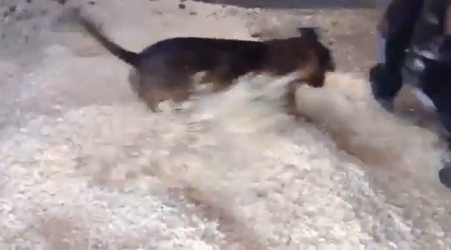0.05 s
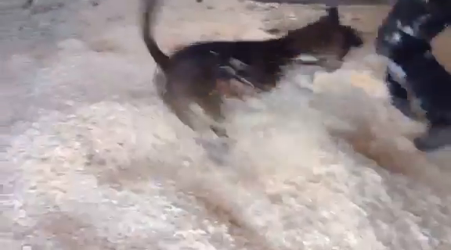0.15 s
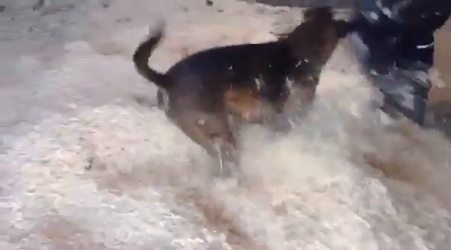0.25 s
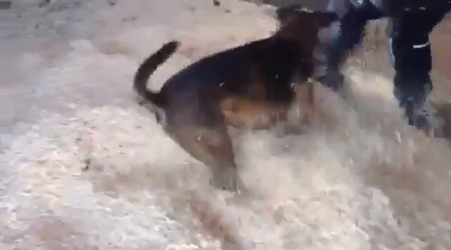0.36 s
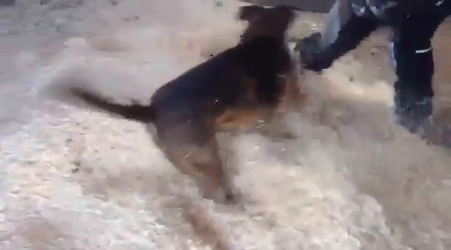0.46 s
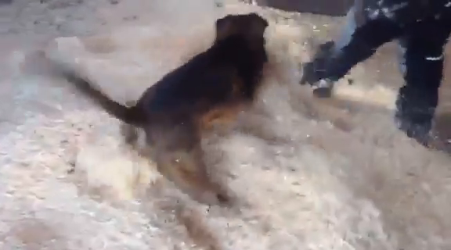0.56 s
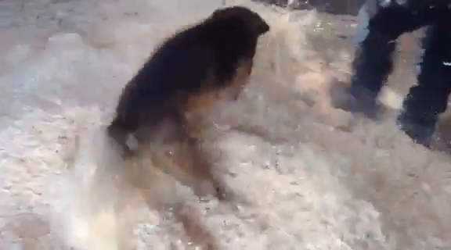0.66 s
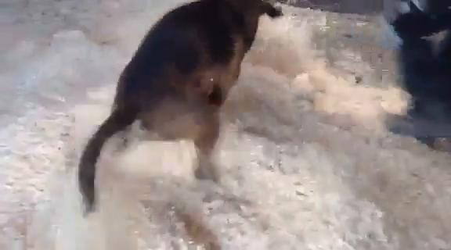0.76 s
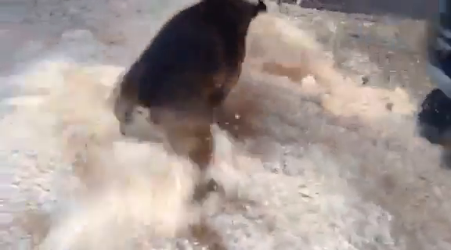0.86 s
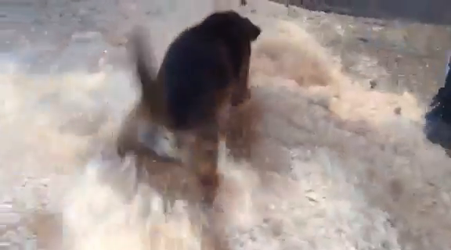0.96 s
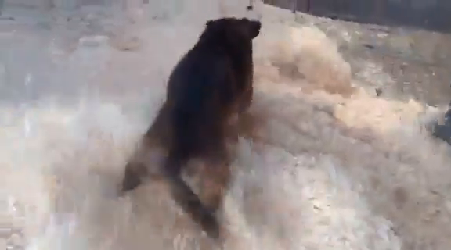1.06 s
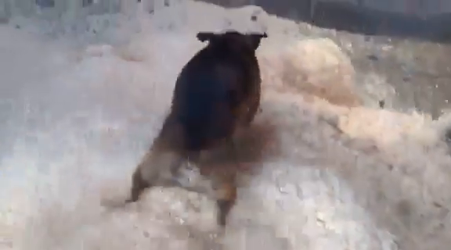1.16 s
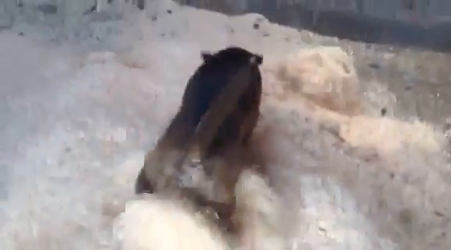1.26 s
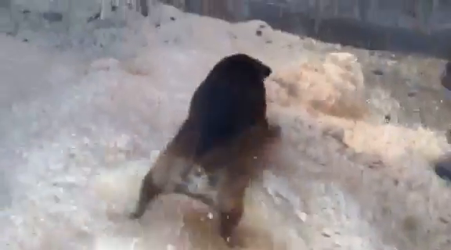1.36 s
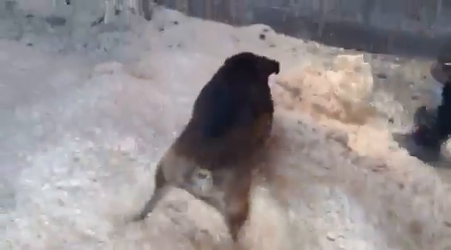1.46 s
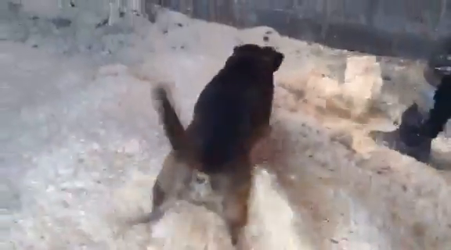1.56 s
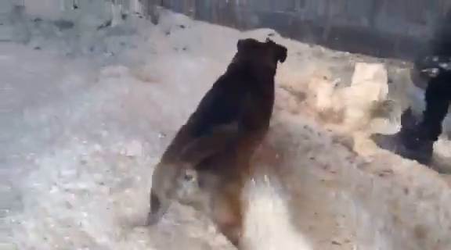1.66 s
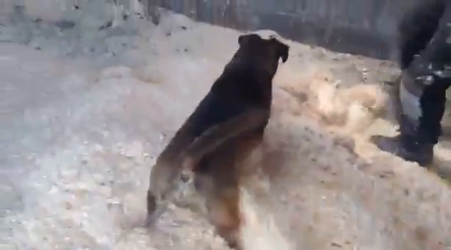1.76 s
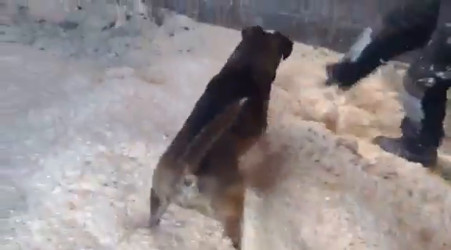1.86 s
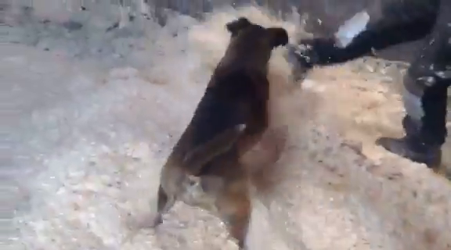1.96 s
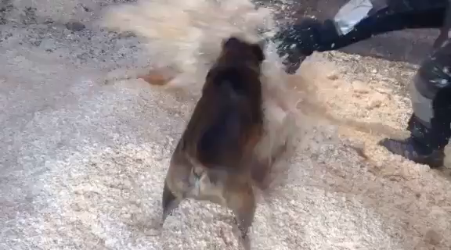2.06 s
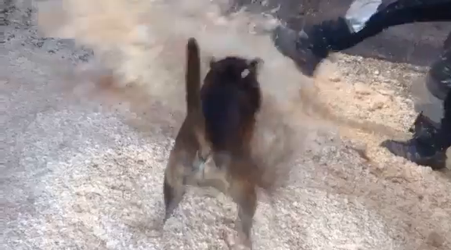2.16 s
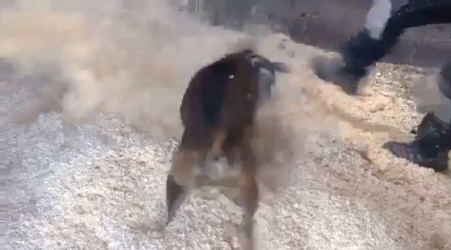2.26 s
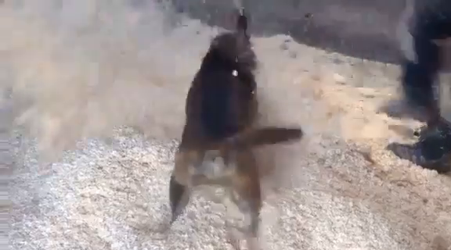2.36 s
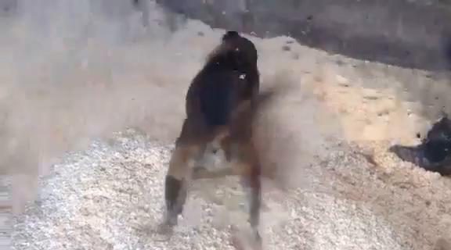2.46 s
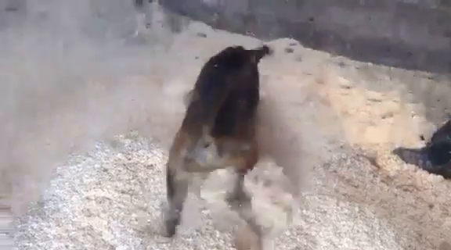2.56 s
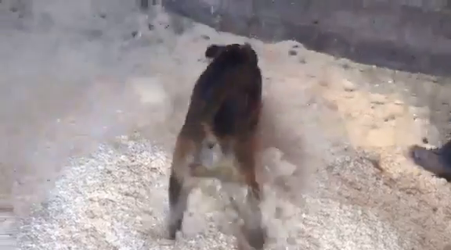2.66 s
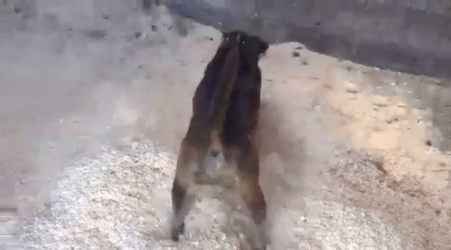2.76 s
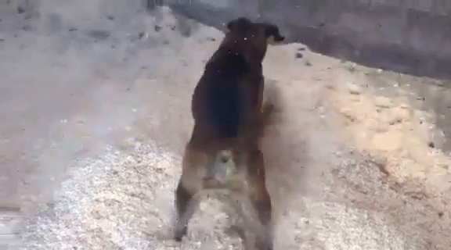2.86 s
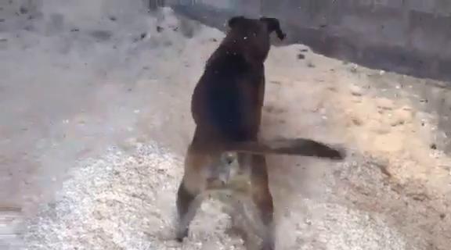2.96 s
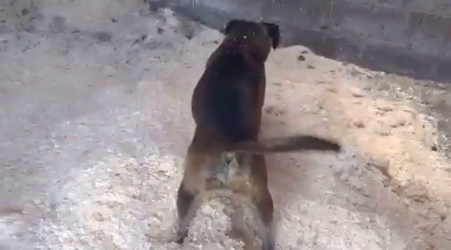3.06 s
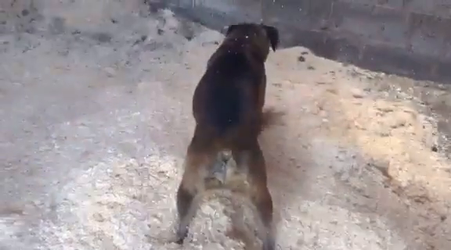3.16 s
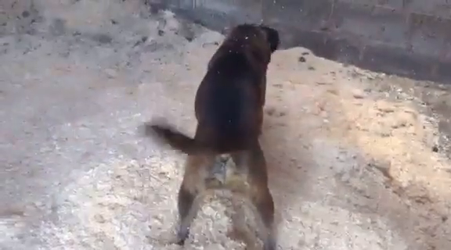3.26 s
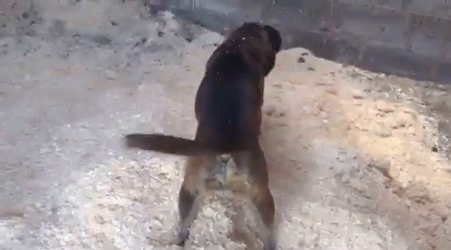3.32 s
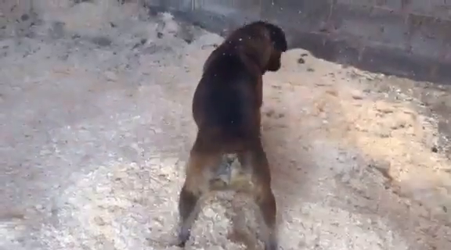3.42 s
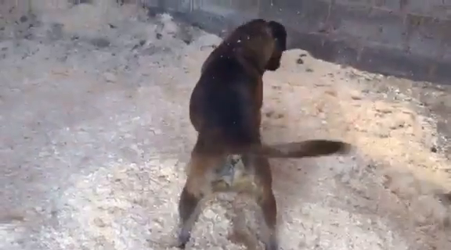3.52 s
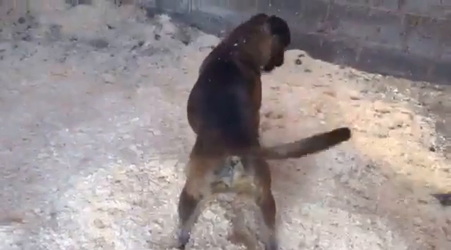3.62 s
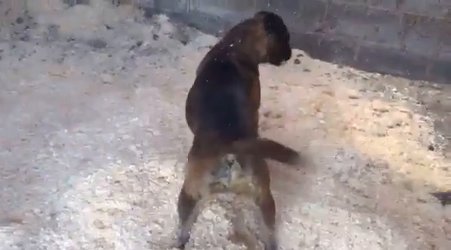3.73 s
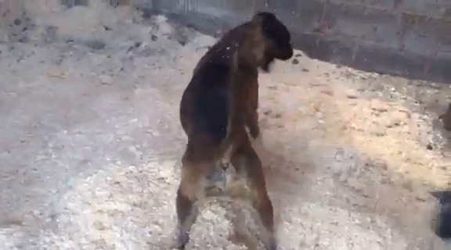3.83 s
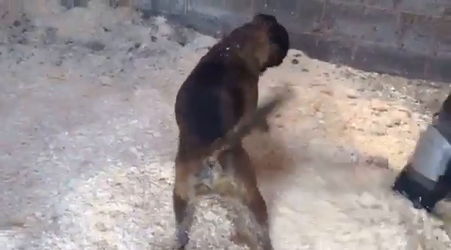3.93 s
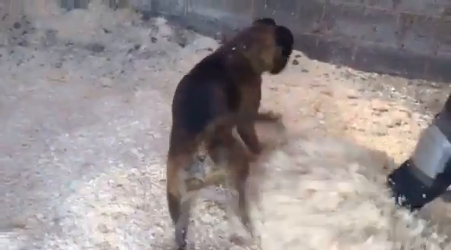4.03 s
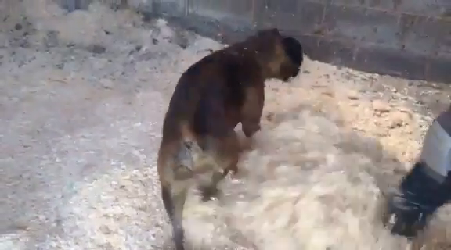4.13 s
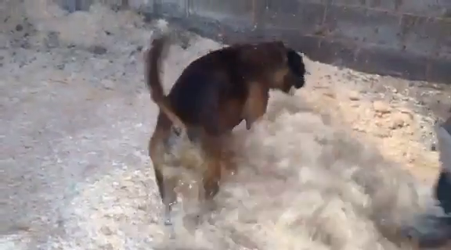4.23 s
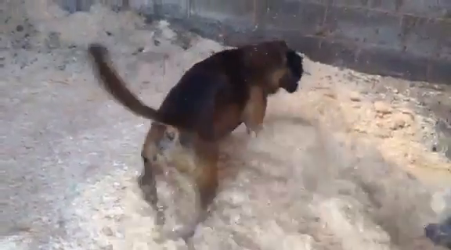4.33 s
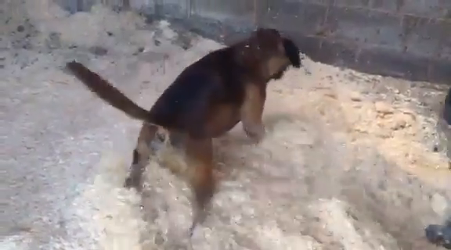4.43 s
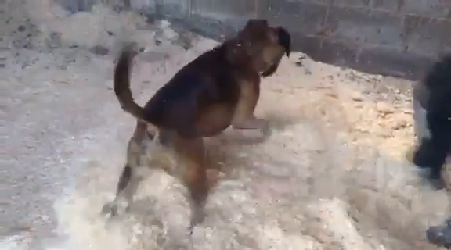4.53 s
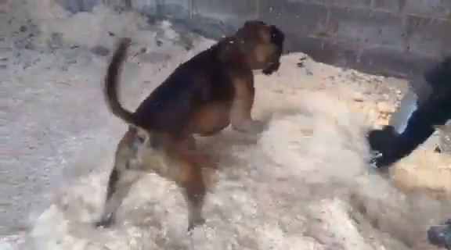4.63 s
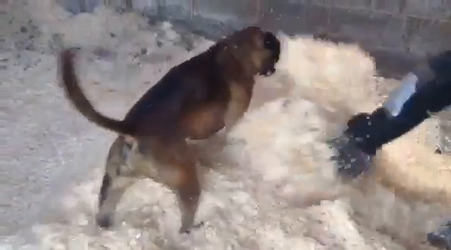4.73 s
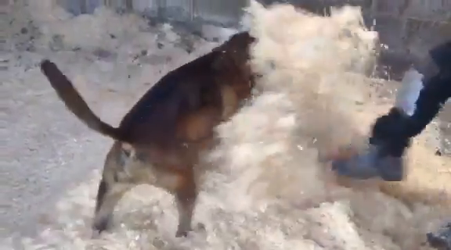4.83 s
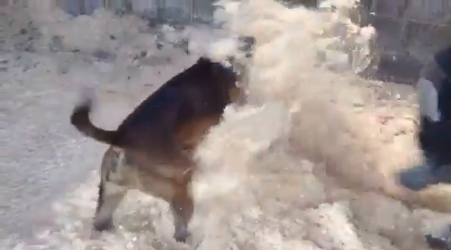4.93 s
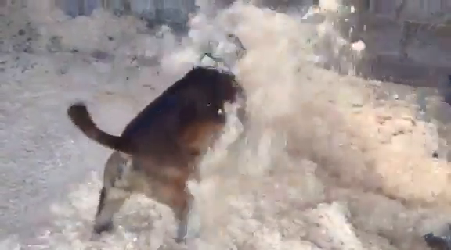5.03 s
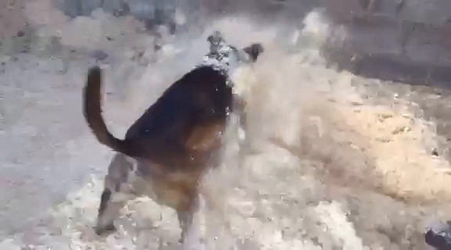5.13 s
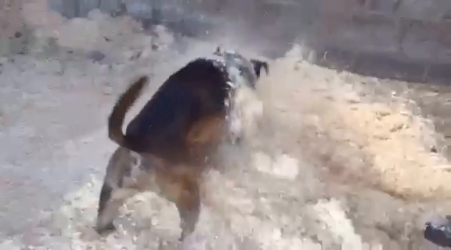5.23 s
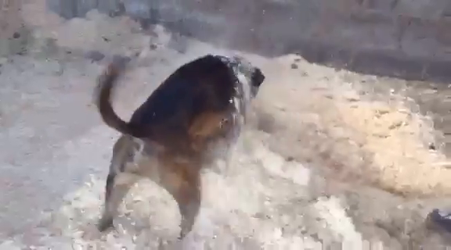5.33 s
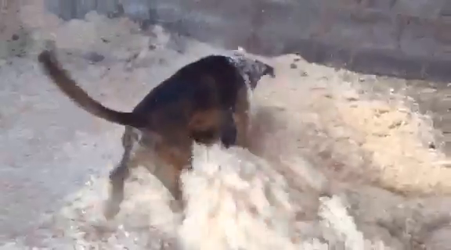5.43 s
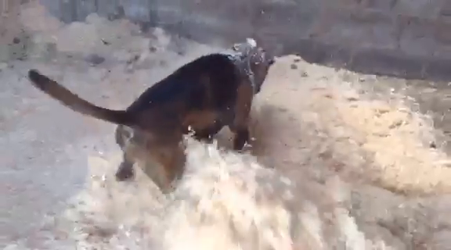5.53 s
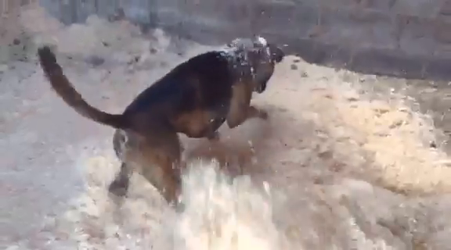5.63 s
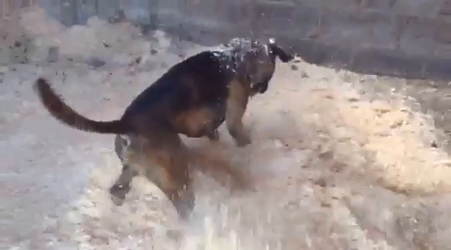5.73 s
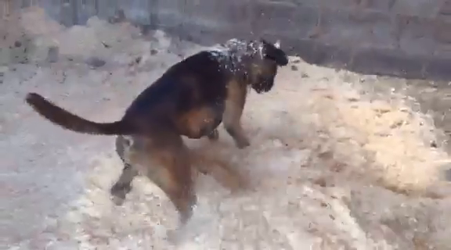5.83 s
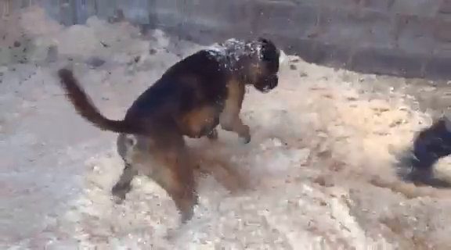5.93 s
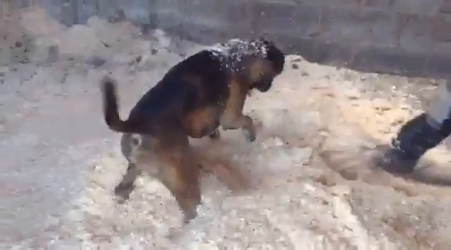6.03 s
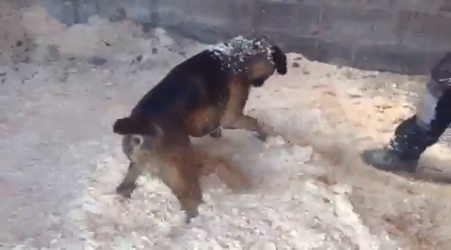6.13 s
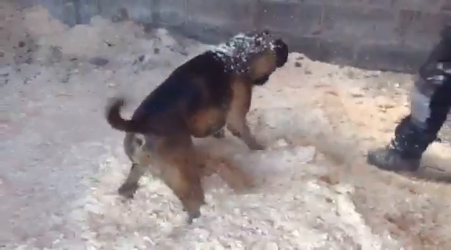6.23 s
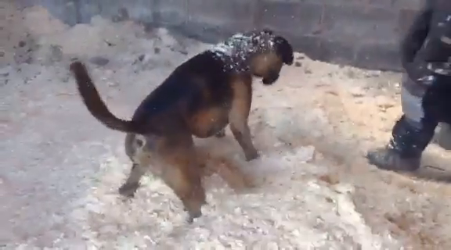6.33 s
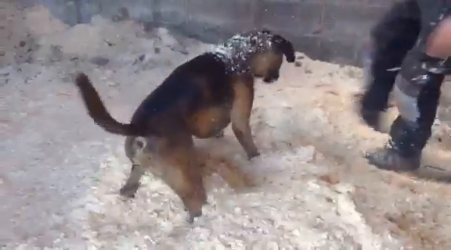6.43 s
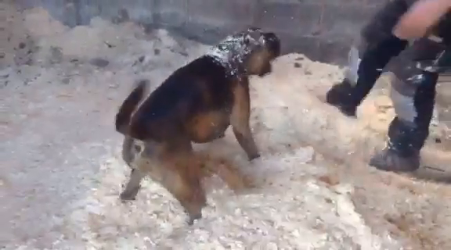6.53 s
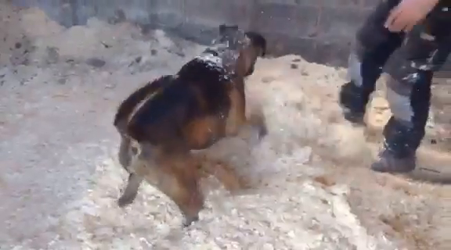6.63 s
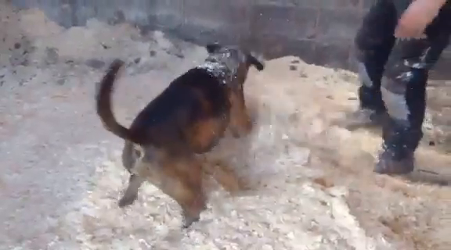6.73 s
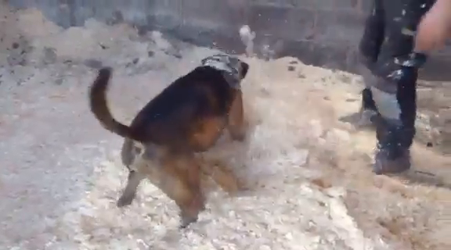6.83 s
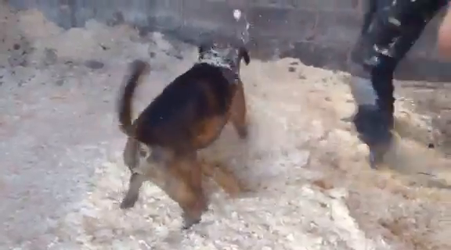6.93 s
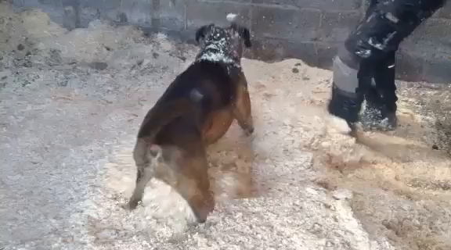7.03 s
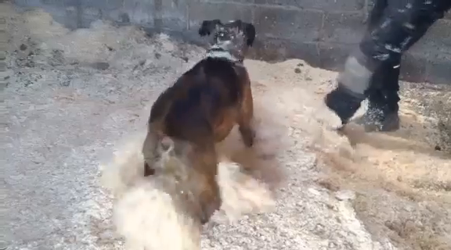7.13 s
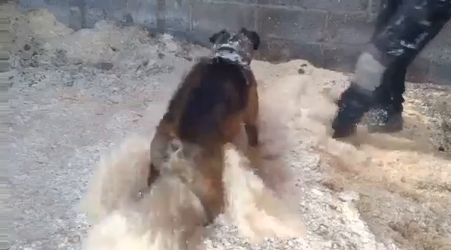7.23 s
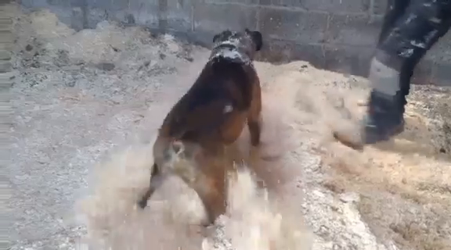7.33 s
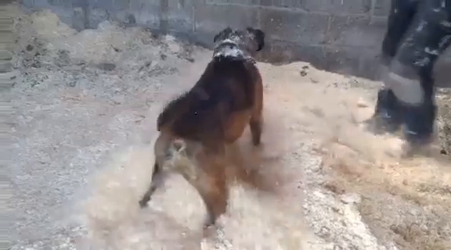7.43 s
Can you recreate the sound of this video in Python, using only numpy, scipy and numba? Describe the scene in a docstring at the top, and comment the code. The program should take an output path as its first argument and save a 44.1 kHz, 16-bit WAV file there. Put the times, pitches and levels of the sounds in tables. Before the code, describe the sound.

Irregular crunchy scrapes through loose wood shavings, with light flakes showering down, dull paw and boot thuds, and brief scratches on hard ground.

```python
"""Crunching wood shavings and a fine hiss of falling flakes start at once, with dull thuds and scratches.
A dog digs in a deep dry bed in a block-walled pen while a boot kicks heaps at it; late on, claws rasp.
Small decaying sines make the crunch, crackle and rasp; shaped noise makes the hiss, dull pushes and air.
Thuds and scratches are short rings of tone and noise; the walls add a short answer of fading noise.
A single phone microphone hears it all."""
import sys
import numpy as np
from scipy import signal
from scipy.fft import rfft, irfft, next_fast_len
from scipy.io import wavfile
from scipy.ndimage import uniform_filter1d, map_coordinates
from numba import njit

SR = 44100
rng = np.random.default_rng(int(sys.argv[2]) if len(sys.argv) > 2 else 0)


def pcm_store(signal):
    """Save signal as 16-bit PCM."""
    levels = np.round(np.clip(np.atleast_2d(signal), -1, 1) * 32767)
    wavfile.write(sys.argv[1], SR, levels.astype(np.int16).T)


N = 329868  # length in samples, about 7.5 s
STEP_MS = 2.5  # spacing of the coarse time grid for event shapes

# the bed sliding and settling between strokes: (time [s], crunch level [dB], hiss level [dB])
SETTLING = [(0.0, -70.5, -37), (0.6, -63, -54.5), (1.2, -59.5, -42), (1.8, -74, -47), (2.4, -73.5, -46),
            (2.8, -80, -58), (3.05, -70, -62), (3.75, -63, -58), (4.1, -58.5, -50.5), (4.9, -62.5, -48),
            (5.5, -59.5, -44.5), (6.0, -63, -52), (6.35, -68.5, -55), (6.9, -63, -50), (7.48, -75, -50)]


def amp(db):
    """Turn a level in dB into a gain."""
    return 10 ** (np.asarray(db) / 20)


def unit(x):
    """Scale x to an average (rms) strength of 1."""
    return x / np.sqrt(np.mean(x ** 2) + 1e-20)


def along(points, hz):
    """Read a curve of (frequency [Hz], value) points, joined on a log frequency axis."""
    point_hz, values = np.transpose(points)
    return np.interp(np.log(hz + 1), np.log(point_hz + 1), values)


def curves(rows):
    """Join each column after the time with straight lines, one value per sample."""
    times, *columns = np.transpose(rows)
    return [np.interp(np.arange(N) / SR, times, column) for column in columns]


def wobble(rate):
    """Draw a smooth random curve with `rate` random points a second."""
    points = rng.standard_normal(int(N * rate / SR) + 4)
    return map_coordinates(points, [np.arange(N) * rate / SR])


def filtered(x, response):
    """Multiply the spectrum of x by a response that depends on frequency."""
    size = next_fast_len(N + SR // 2)
    spectrum = rfft(x, size) * response(np.fft.rfftfreq(size, 1 / SR))
    return irfft(spectrum, size)[..., :N]


def streaky(shape, across, along_time):
    """Make a random time-frequency field of rms 1, smoothed over neighbouring cells."""
    field = uniform_filter1d(rng.standard_normal(shape), size=across, axis=0)
    return unit(uniform_filter1d(field, size=along_time, axis=1))


def rush(spectrum, patchy_db):
    """Make noise of rms 1 with a given spectrum and randomly louder and softer patches."""
    z = signal.stft(rng.standard_normal(N + 512), nperseg=512)[2]
    patches = amp(patchy_db * streaky(z.shape, across=3, along_time=6))
    noise = signal.istft(z * patches, nperseg=512)[1][:N]
    return unit(filtered(noise, lambda hz: amp(along(spectrum, hz))))


@njit
def rings(starts, steps, lives, sizes, count):
    """Add sines that swell and die: start sample, radians a sample, samples to the peak, size."""
    out = np.zeros(count)
    for i in range(len(starts)):
        for k in range(min(int(7 * lives[i]), count - starts[i])):
            swell = k / lives[i] * np.exp(-k / lives[i])
            out[starts[i] + k] += sizes[i] * np.sin(steps[i] * k) * swell
    return out


def grains(pitch_hz, count, octaves, cycles, scatter_db):
    """Small breaks ring at random moments around a moving pitch, swelling for a number of cycles."""
    starts = rng.integers(0, N, count)
    hz = np.clip(pitch_hz[starts] * 2 ** (octaves * rng.standard_normal(count)), 100, SR / 3)
    sizes = amp(scatter_db * rng.exponential(size=count)) * rng.choice([-1, 1], count)
    sizes = sizes * np.sqrt(hz / 1000)  # higher grains are shorter, so this evens out their energy
    return unit(rings(starts, 2 * np.pi * hz / SR, cycles * SR / hz, sizes, count=N))


def swells(peak_s, fall_ms, rise, roundness):
    """Power of each event on the coarse grid, 1 at its peak: a quicker rise, a slower fall."""
    grid_ms = np.arange(0, N / SR * 1000, STEP_MS)
    late = (grid_ms - peak_s[:, None] * 1000) / fall_ms[:, None]
    distance = np.where(late < 0, -late / rise, late)
    return 10 ** -np.minimum(distance ** roundness, 10)


def per_sample(x):
    """Stretch a curve from the coarse grid to one value per sample."""
    return np.interp(np.arange(N) / SR * 1000, np.arange(len(x)) * STEP_MS, x)


def summed(shapes, levels_db, under_db):
    """Gain of noisy events on top of a continuing part: their powers add."""
    return np.sqrt(per_sample(amp(2 * levels_db) @ shapes) + amp(2 * under_db))


def shower():
    """Many light flakes land together, heard as a fine, nearly even hiss of noise."""
    # handfuls thrown up and landing: (time of the peak [s], time to fall 10 dB [ms], level [dB])
    tosses = [(0.021, 35, -34.5), (0.091, 73, -42), (0.355, 40, -41.5), (0.485, 182, -41), (0.646, 94, -43),
              (0.747, 47, -40), (0.848, 134.5, -40), (1.018, 46, -40), (1.259, 77, -41), (1.423, 76.5, -43),
              (1.55, 101, -50), (1.61, 181.5, -42), (1.9, 30, -44), (1.95, 100, -37), (2.178, 142, -37.0),
              (2.221, 46, -38), (2.36, 90, -35), (2.504, 118.5, -40.5), (2.654, 106, -38),
              (2.77, 210, -45.5), (3.389, 41, -44.0), (3.442, 104, -45), (3.546, 87, -44), (3.835, 57, -52),
              (3.968, 70, -36.5), (4.13, 293, -46.5), (4.31, 112, -46.5), (4.429, 92, -44),
              (4.68, 125, -39.5), (5.059, 207, -40.5), (5.395, 145, -45.5), (5.52, 69, -45.5),
              (5.652, 43.5, -42.5), (5.88, 185.5, -40.5), (5.993, 113, -44.0), (6.196, 117, -51),
              (6.559, 115, -41), (6.825, 117, -43.5), (7.03, 80, -43), (7.12, 109, -39), (7.2, 55, -38.5),
              (7.475, 142, -47)]
    # spectrum of landing flakes: (frequency [Hz], relative level per Hz [dB])
    flakes = [(700, -15.5), (1500, -13), (2600, -5.5), (3900, 1), (5000, 3.5), (6800, 2), (7600, 0),
              (8300, -16)]
    peak_s, fall_ms, level_db = np.transpose(tosses)
    shapes = swells(peak_s, fall_ms, rise=0.69, roundness=1.88)
    hiss = amp(0.6 * wobble(40)) * rush(flakes, patchy_db=1.7)
    flutter = amp(1.0 * wobble(36))
    settling_hiss_db = curves(SETTLING)[1]
    return summed(shapes, level_db, settling_hiss_db) * flutter * hiss


def strokes():
    """Packed shavings break under paw and boot: coarse crunch, finer crackle above, dull push below."""
    # strokes through the bed: (time of the peak [s], time to fall 10 dB [ms], crunch level [dB],
    # crunch pitch [Hz], crackle level [dB], level of the weight on the ground [dB])
    stroke_rows = [(0.026, 95, -44.5, 622, -48, -68), (0.103, 94, -43.0, 842, -43.5, -47.5),
                   (0.177, 55, -43, 640, -45, -45.5), (0.352, 143.5, -53, 925, -55.5, -57.5),
                   (0.422, 129.5, -45.5, 886, -46.5, -76.0), (0.491, 85.5, -47.5, 673, -46.5, -52),
                   (0.575, 44, -55, 940, -49.5, -51), (0.679, 121, -50, 530, -52, -49.5),
                   (0.758, 52.5, -70, 1055, -46.5, -60), (0.847, 72, -44.0, 1165, -46.5, -47.5),
                   (0.965, 149.5, -63, 1120, -50.5, -73), (1.039, 130.5, -50.5, 1108, -47, -53),
                   (1.131, 167.5, -48.5, 770, -48, -58.5), (1.271, 80, -41, 1034, -39.5, -50),
                   (1.508, 252.5, -55, 1054, -46, -58), (1.62, 55, -44.5, 940, -43.5, -46),
                   (1.744, 50, -53, 874, -55, -62), (1.804, 40, -59.5, 884, -51.5, -57),
                   (1.935, 78, -45, 786, -41, -49.5), (2.149, 118, -48, 1235, -45.5, -60.5),
                   (2.26, 105.5, -56, 732, -48, -55), (2.34, 54.5, -34, 999, -42, -41.5),
                   (2.478, 112.5, -49.5, 560, -43, -47.5), (2.628, 33.5, -45, 722, -37.5, -46.5),
                   (2.681, 75.5, -46.5, 613, -46, -50), (2.75, 168, -55.5, 707, -49.5, -58.0),
                   (3.137, 61, -56.5, 768, -56, -57), (3.372, 58.5, -50, 1086, -46.5, -59.5),
                   (3.471, 128, -58, 944, -53.5, -67), (3.567, 37.5, -44.5, 1015, -41.5, -55.5),
                   (3.836, 50.5, -54, 924, -53, -59.5), (3.97, 69, -40, 1153, -36, -49),
                   (4.174, 70.5, -73.5, 903, -50.5, -76), (4.307, 98.5, -52, 1050, -46.5, -63),
                   (4.415, 56, -51.5, 1270, -48, -59.5), (4.65, 136, -52.5, 1297, -46, -61),
                   (4.719, 72.5, -50, 648, -62, -52), (4.966, 59.5, -56.5, 904, -50.5, -58),
                   (5.035, 74.5, -43, 1150, -43, -54.5), (5.178, 40.5, -42, 1056, -48, -50.5),
                   (5.245, 35, -43, 602, -39.5, -48), (5.404, 38, -59.5, 906, -46.5, -67),
                   (5.515, 108.5, -51.5, 1003, -46.5, -80), (5.633, 74.5, -44.5, 1347, -41, -61.5),
                   (5.882, 83.5, -44.5, 1160, -39, -53.5), (5.939, 71, -41.5, 866, -39.5, -58),
                   (6.196, 110, -59.5, 965, -62, -63), (6.44, 132, -54, 784, -53.5, -59),
                   (6.549, 90.5, -48.5, 808, -46, -56.5), (6.744, 75, -50.5, 574, -68.5, -58),
                   (6.852, 89, -52.5, 855, -51, -69), (7.013, 66.5, -44, 815, -46.5, -50.5),
                   (7.093, 96.5, -42, 641, -45.5, -54.5), (7.196, 131, -50.0, 820, -54, -61),
                   (7.45, 95, -62, 1184, -56.5, -70)]
    # centre pitch of the crackle: (time [s], pitch [Hz])
    crackle_pitch = [(0, 3280), (0.14, 2620), (2.27, 2890), (2.33, 2010), (2.41, 2906), (3.73, 2460),
                     (3.95, 2906), (4.79, 2620), (4.98, 3000), (5.92, 2300), (6.41, 2110), (6.71, 2600),
                     (7.0, 2196), (7.48, 2600)]
    peak_s, fall_ms, crunch_db, hz, crackle_db, weight_db = np.transpose(stroke_rows)
    # rise time over fall time; roundness 1 is a pointed peak, 2 a round one
    shapes = swells(peak_s, fall_ms, rise=0.538, roundness=1.31)
    settling_db = curves(SETTLING)[0]

    share = amp(2 * crunch_db)[:, None] * shapes
    crunch_hz = per_sample(hz @ share / share.sum(axis=0))  # louder strokes pull the pitch harder
    crunch = grains(crunch_hz, count=14000, octaves=0.756, cycles=2.64, scatter_db=1.8)
    crackle = grains(curves(crackle_pitch)[0], count=30000, octaves=0.4606, cycles=3.25, scatter_db=1.8)

    # the settling crackle and weight are set against the settling crunch
    crunching = summed(shapes, crunch_db, settling_db) * crunch
    crackling = summed(shapes, crackle_db, settling_db + 4.5) * crackle
    pushing = summed(shapes, weight_db, settling_db - 6.5) * weight()
    stutter = amp(1.36 * wobble(30))  # uneven bedding
    return stutter * (crunching + crackling) + pushing


def weight():
    """Paws and boot push dully and unevenly on the padded ground: low noise at rms 1."""
    # spectrum of the pushes: (frequency [Hz], relative level per Hz [dB])
    ground = [(30, -48), (80, -8), (140, -1), (250, 2), (400, -8.5), (800, -32)]
    return unit(amp(0.73 * wobble(35)) * rush(ground, patchy_db=2.0))


def still_air():
    """The still air of the pen is a very quiet, patchy noise."""
    # spectrum of the air: (frequency [Hz], relative level per Hz [dB])
    air = [(24, -64), (40, -31), (260, -2.5), (1480, -14), (2300, -9), (3760, -7), (6710, -4), (7670, -2.5),
           (8200, -27.5), (10700, -64.5), (18000, -120)]
    return amp(-65) * rush(air, patchy_db=2.6)


def walls(x):
    """The walls answer with a tail of noise in which each frequency dies at its own speed."""
    # how fast the answer dies: (frequency [Hz], time to fall 60 dB [s])
    wall_decay = [(200, 0.31), (1500, 0.069), (8000, 0.046)]
    hz, t, z = signal.stft(rng.standard_normal(SR // 2), SR, nperseg=256)
    fade = amp(-60 * t / along(wall_decay, hz)[:, None])
    tail = signal.istft(z * fade, SR, nperseg=256)[1]
    delayed = np.pad(x, (400, 0))  # about 9 ms
    return signal.fftconvolve(delayed, tail / np.linalg.norm(tail))[:N]


def hollowed(x, width_hz, waver_hz, gaps):
    """Cut a wavering dip into the spectrum of x and make its middle range flicker in thin streaks."""
    # hollow between crackle and hiss, and flicker of the rustle:
    # (time [s], centre of the hollow [Hz], depth [dB], flicker before weighting by frequency [dB])
    hollow = [(0, 3860, 0, 4.5), (2.8, 3800, 1, 4), (3.1, 3800, 1.5, 3.5), (3.6, 3800, 1.5, 4.5),
              (5.5, 3750, 1, 4.5), (5.62, 4140, 13, 8), (5.78, 3800, 10, 4.5), (5.92, 4000, 13, 5.5),
              (6.1, 3720, 7.5, 4), (6.9, 3630, 7.5, 5), (7.1, 4500, 10, 8), (7.48, 3600, 6.5, 5.5)]
    hz, t, z = signal.stft(x, SR, nperseg=1024)
    times, centre_hz, depth_db, flicker_db = np.transpose(hollow)
    waver = waver_hz * wobble(12)[np.minimum((t * SR).astype(int), N - 1)]
    centre_hz = np.interp(t, times, centre_hz) + waver
    dip = np.interp(t, times, depth_db) * np.exp(-0.5 * ((hz[:, None] - centre_hz) / width_hz) ** 2)

    streaks = streaky(z.shape, across=2, along_time=5)
    streaks = streaks - gaps * (streaks ** 2 - 1)  # dips go deeper than rises
    # share of the flicker: (frequency [Hz], factor)
    share = along([(250, 0.036), (700, 0.49), (3500, 1), (5000, 0.43), (7500, 0.3)], hz)
    flicker = share[:, None] * np.interp(t, times, flicker_db) * streaks
    return signal.istft(z * amp(flicker - dip), SR, nperseg=1024)[1][:N]


def bursts(rows, sharpness, rise, clear, crack):
    """Sudden rings mix a clear tone with grit around one pitch, opened by a brief crack of noise."""
    # rows: (time [s], level [dB], pitch [Hz], time to fall 60 dB [s]); rise in seconds
    out = np.zeros(N + SR)
    t = np.arange(SR // 4) / SR
    for start_s, level_db, hz, t60 in rows:
        b, a = signal.iirpeak(hz, sharpness, SR)
        noise = rng.standard_normal(2 * len(t))
        grit = signal.lfilter(b, a, signal.lfilter(b, a, noise))[len(t):]
        tone = clear * np.sin(2 * np.pi * hz * t)
        opening = crack * amp(-60 * t / 0.012) * rng.standard_normal(len(t))
        envelope = amp(level_db - 60 * t / max(t60, 0.01)) * (1 - np.exp(-t / rise))
        out[round(start_s * SR):][:len(t)] += envelope * (unit(grit) + tone + opening)
    return out[:N]


def thuds():
    """Paws and boot land softly: low rings that fall 60 dB in 21 cycles."""
    # landings: (time [s], level [dB], pitch [Hz])
    landings = [(0.119, -43.5, 134), (0.173, -37.5, 292), (0.474, -42.5, 173), (1.108, -54, 450),
                (1.25, -49, 197), (1.795, -45, 261), (1.903, -54, 210), (2.25, -49.5, 290),
                (2.344, -38, 316), (2.389, -44, 250), (2.618, -38, 306), (2.667, -45, 171),
                (3.143, -49, 368), (3.557, -53, 181), (3.96, -42, 297), (4.005, -50, 350),
                (4.962, -53, 295), (5.238, -46.5, 269), (5.24, -35, 460), (5.272, -40.5, 410),
                (5.305, -48, 430), (5.881, -45.5, 282), (6.428, -46.5, 255), (6.57, -51.5, 190),
                (6.735, -48, 186)]
    rows = [(start_s, level_db, hz, 21 / hz) for start_s, level_db, hz in landings]
    return bursts(rows, sharpness=2.1, rise=0.0024, clear=2.34, crack=0.1)


def catches():
    """Claws and boot sole scratch the hard ground under the bed: short, brighter rings."""
    # scratches: (time [s], level [dB], pitch [Hz], time to fall 60 dB [s])
    scratches = [(0.654, -43, 897, 0.064), (1.261, -39.5, 1178, 0.2), (1.618, -47.5, 800, 0.07),
                 (1.903, -51, 574, 0.1), (2.304, -43.5, 1780, 0.1), (2.323, -35.5, 1940, 0.16),
                 (2.338, -39, 2150, 0.09), (2.326, -35.5, 1150, 0.1), (2.335, -32.5, 800, 0.08),
                 (2.346, -36.5, 905, 0.06), (2.352, -36, 547, 0.064), (2.361, -34.5, 1403, 0.079),
                 (2.376, -33, 1200, 0.05), (3.131, -46, 1860, 0.028), (3.354, -49, 666, 0.07),
                 (3.558, -40.5, 1670, 0.067), (3.832, -50.5, 964, 0.11), (3.953, -44, 535, 0.12),
                 (3.982, -40, 1047, 0.06), (5.013, -33, 1130, 0.038), (5.02, -34.5, 1310, 0.046),
                 (5.158, -41, 980, 0.11), (5.175, -31.5, 1120, 0.051), (5.19, -39, 1060, 0.086),
                 (5.234, -33, 783, 0.04), (5.243, -34, 690, 0.09), (5.659, -44, 641, 0.19),
                 (5.879, -38.5, 1540, 0.034), (6.999, -41.5, 740, 0.06), (7.038, -42, 640, 0.078),
                 (7.085, -37.5, 720, 0.07), (7.095, -33.5, 678, 0.06), (7.108, -36.5, 508, 0.07)]
    return bursts(scratches, sharpness=3.6, rise=0.001, clear=1.6, crack=0.8)


def rasp():
    """Claws skid with a thin rasp: dense short squeaks in a narrow band."""
    # skids: (time [s], level [dB], pitch [Hz])
    skids = [(6.9, -81, 3340), (6.98, -47, 3380), (7.1, -46, 3336), (7.17, -42.5, 3525),
             (7.23, -48.5, 3570), (7.3, -81, 3520)]
    level_db, pitch_hz = curves(skids)
    return amp(level_db) * grains(pitch_hz, count=15000, octaves=0.08, cycles=8.5, scatter_db=0.5)


def scene():
    """All sources meet at one microphone, the same on both channels."""
    bedding = strokes() + rasp()
    contacts = catches() + thuds()
    answer = amp(-13.5) * walls(bedding + contacts)
    rustle = bedding + answer + shower() + still_air()
    heard = contacts + hollowed(rustle, width_hz=366, waver_hz=151, gaps=0.38)
    return np.array([heard, heard])


def record(dry):
    """The phone thins the bass, fades toward its band limit and keeps nothing above it."""
    low_cut_hz, fade_hz, top_hz = 125, 7750, 8200

    def response(hz):
        bass_cut = (1j * hz / (low_cut_hz + 1j * hz)) ** 2
        treble_fade = 1 / np.sqrt(1 + (hz / fade_hz) ** 60)
        return bass_cut * treble_fade * (hz < top_hz)

    return filtered(dry, response)


dry = scene()
out = record(dry)
pcm_store(out)
```